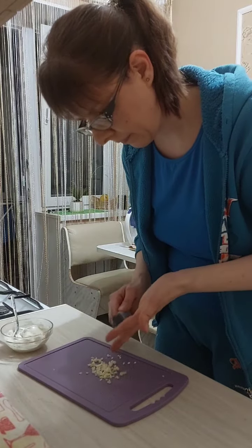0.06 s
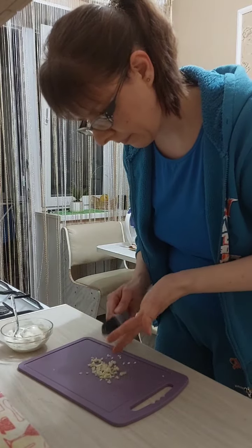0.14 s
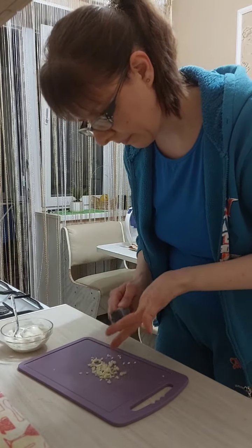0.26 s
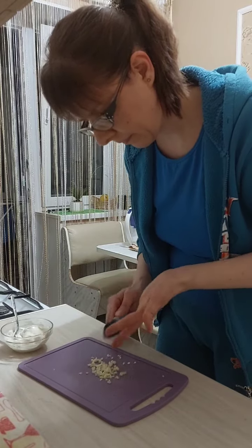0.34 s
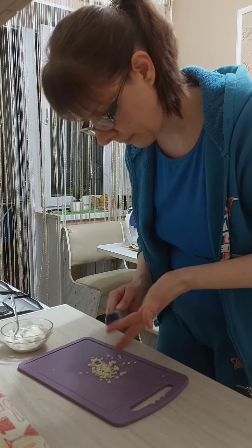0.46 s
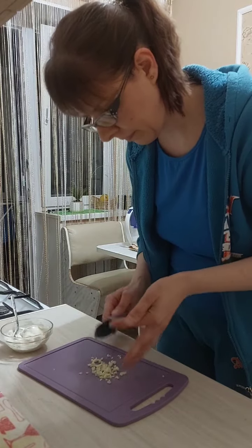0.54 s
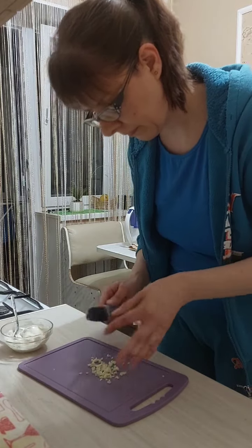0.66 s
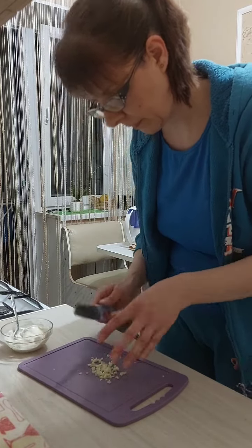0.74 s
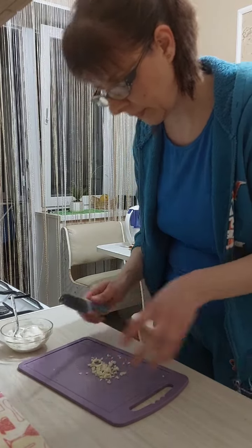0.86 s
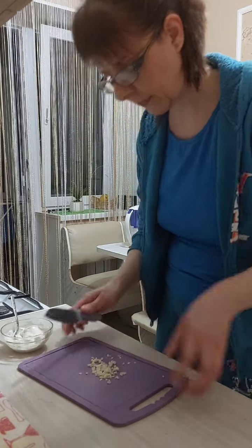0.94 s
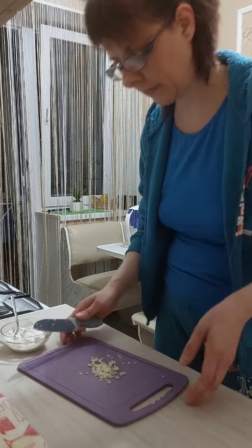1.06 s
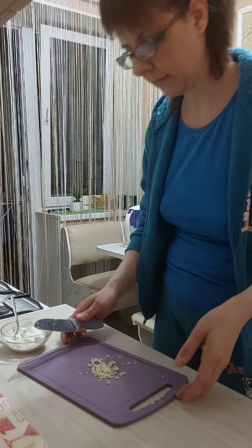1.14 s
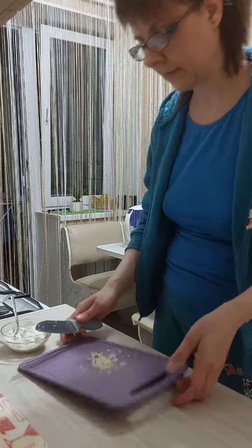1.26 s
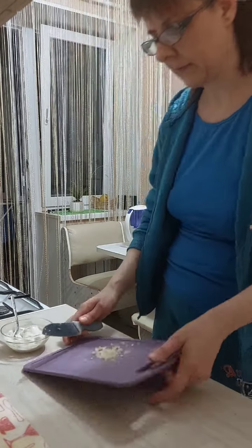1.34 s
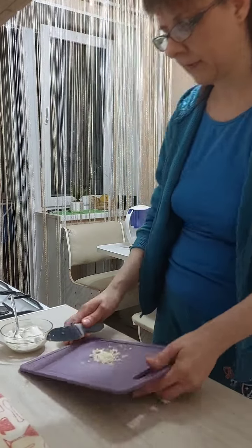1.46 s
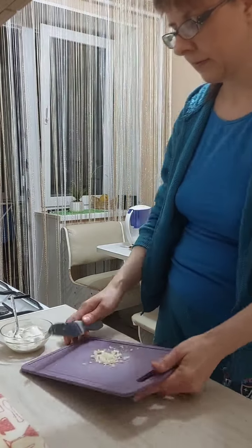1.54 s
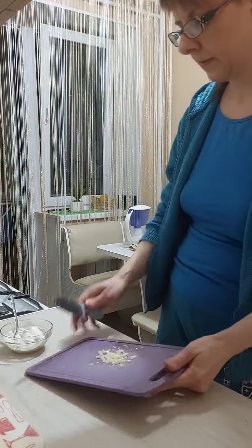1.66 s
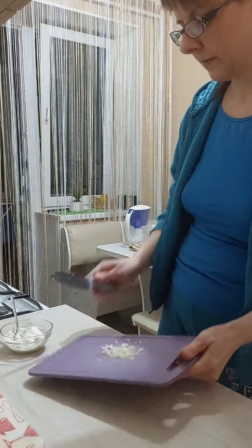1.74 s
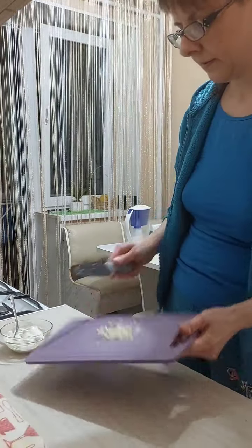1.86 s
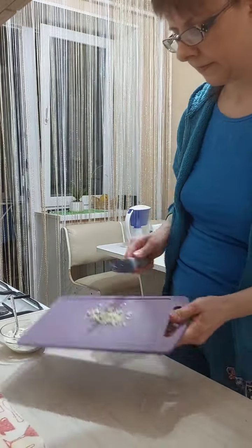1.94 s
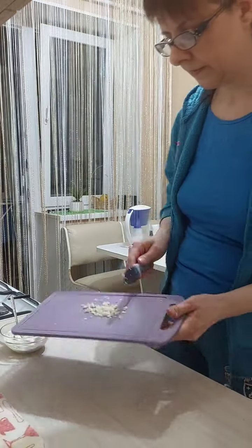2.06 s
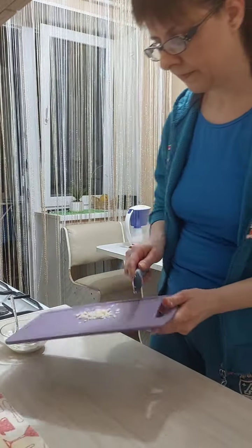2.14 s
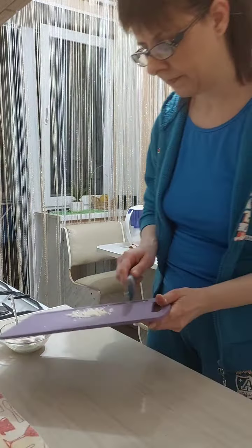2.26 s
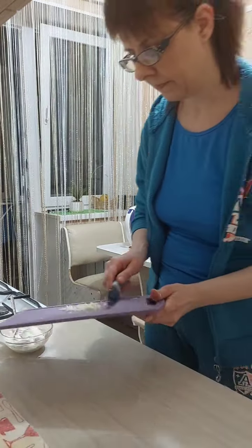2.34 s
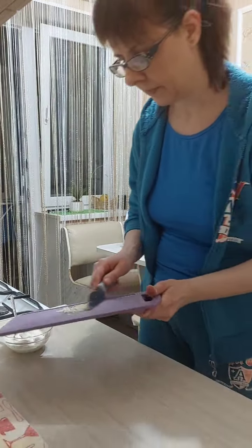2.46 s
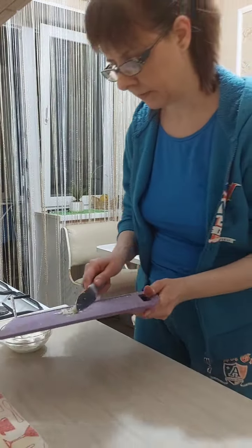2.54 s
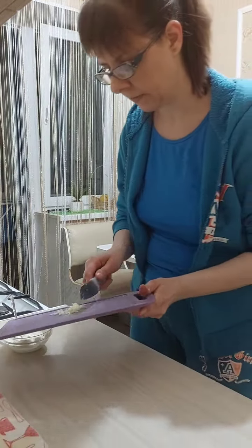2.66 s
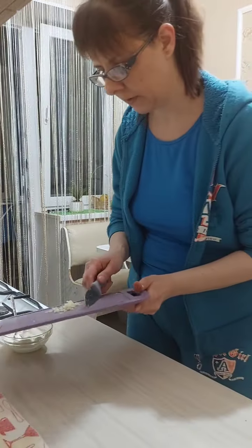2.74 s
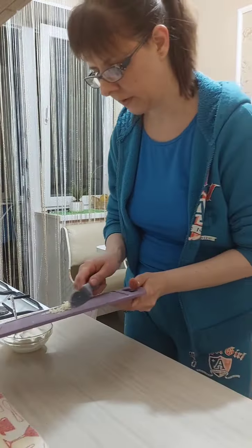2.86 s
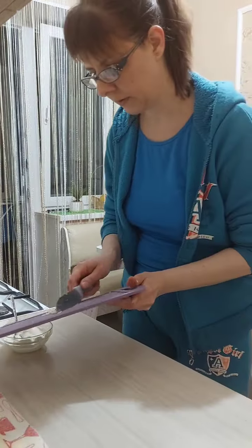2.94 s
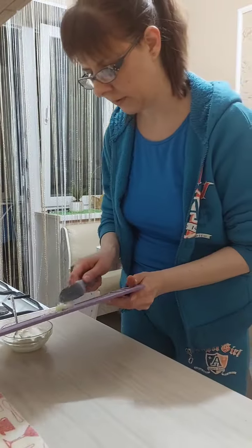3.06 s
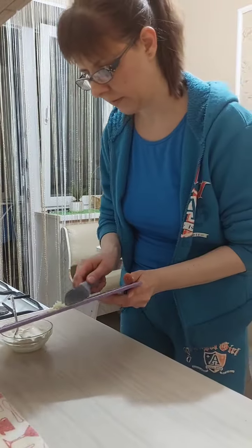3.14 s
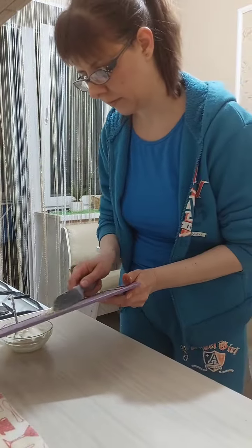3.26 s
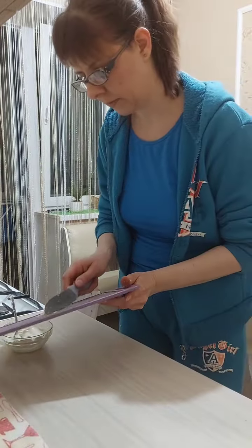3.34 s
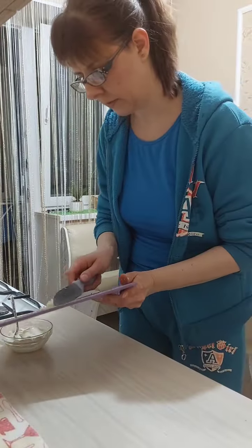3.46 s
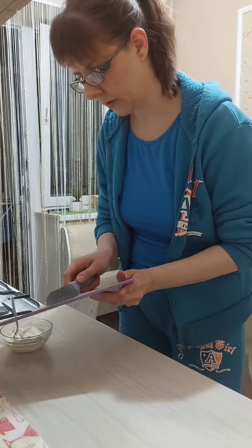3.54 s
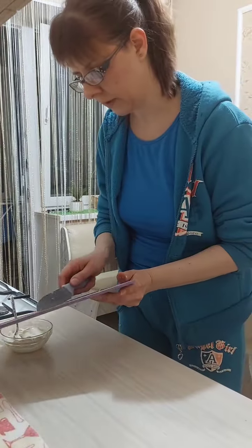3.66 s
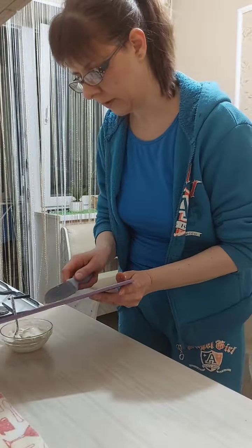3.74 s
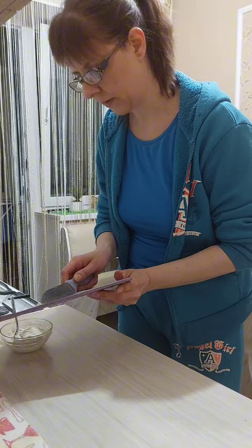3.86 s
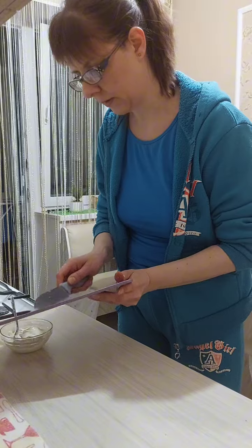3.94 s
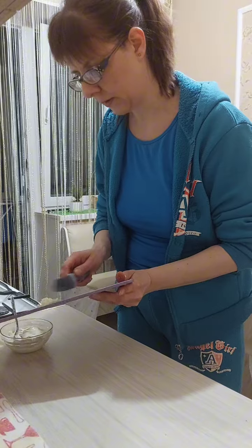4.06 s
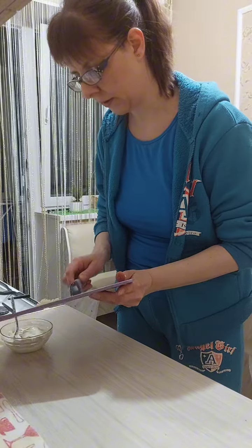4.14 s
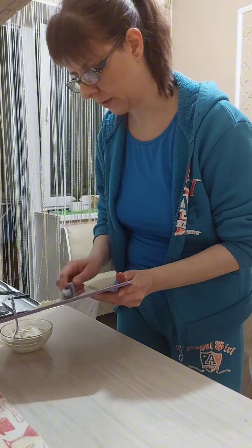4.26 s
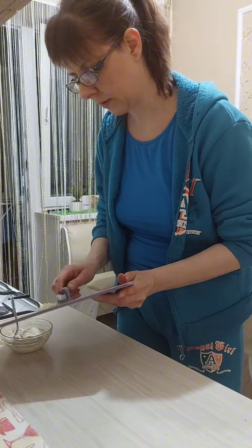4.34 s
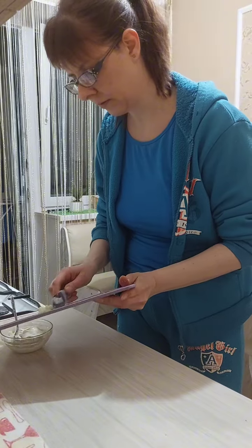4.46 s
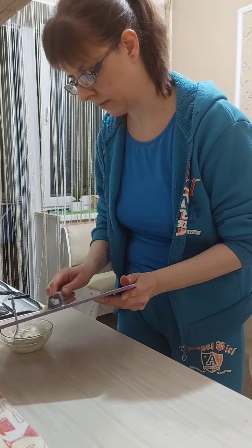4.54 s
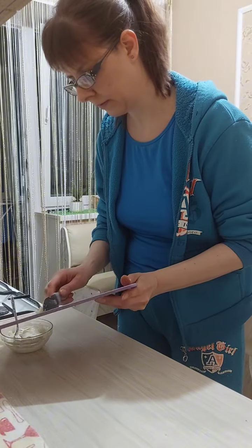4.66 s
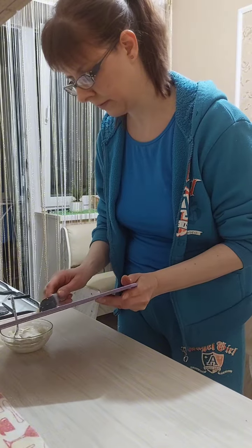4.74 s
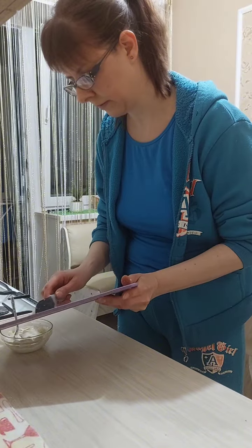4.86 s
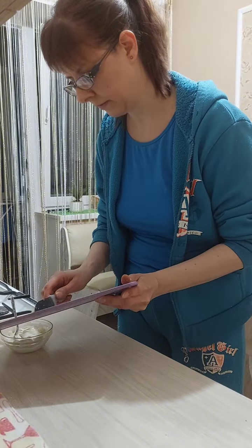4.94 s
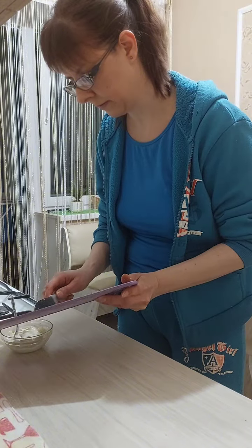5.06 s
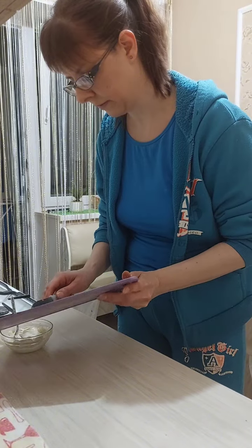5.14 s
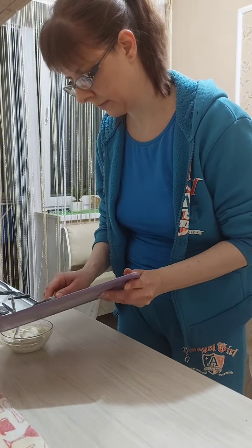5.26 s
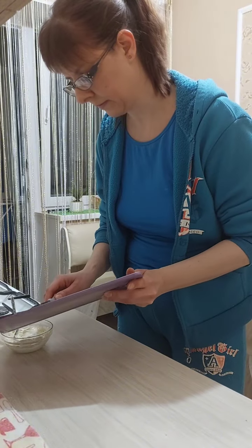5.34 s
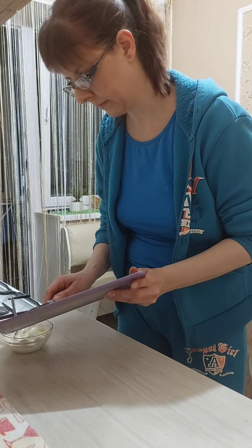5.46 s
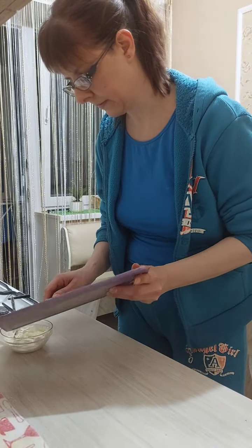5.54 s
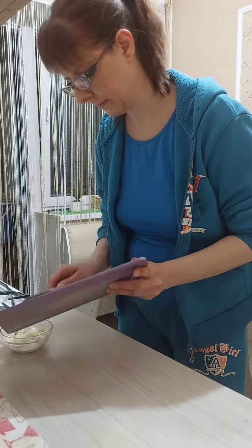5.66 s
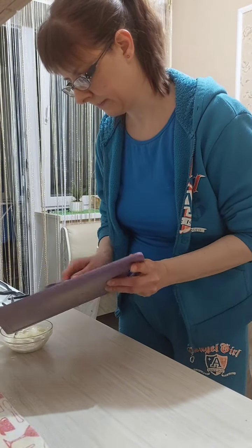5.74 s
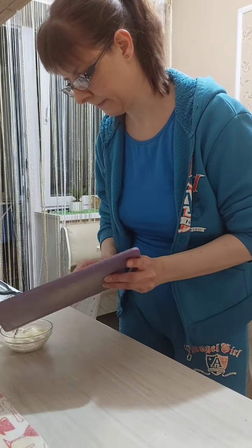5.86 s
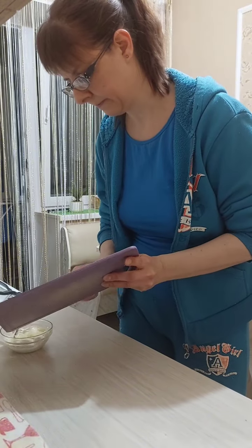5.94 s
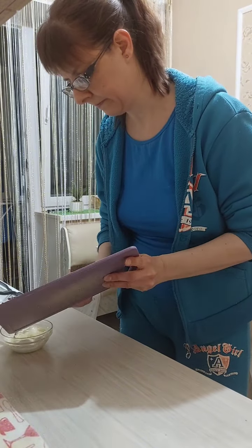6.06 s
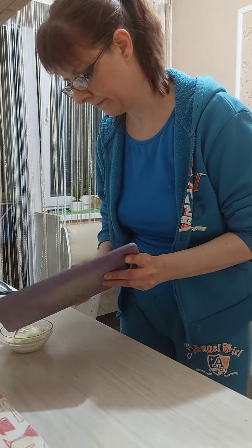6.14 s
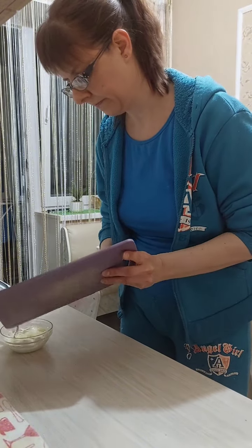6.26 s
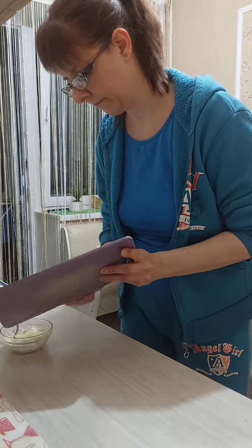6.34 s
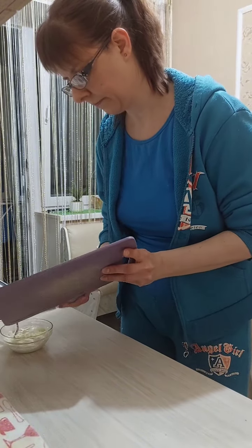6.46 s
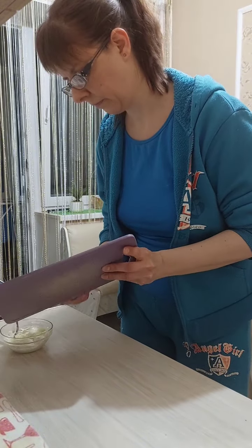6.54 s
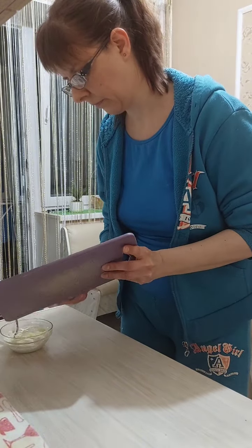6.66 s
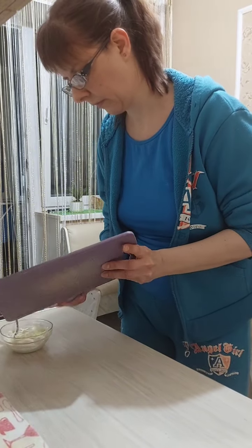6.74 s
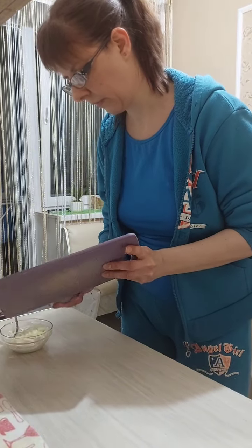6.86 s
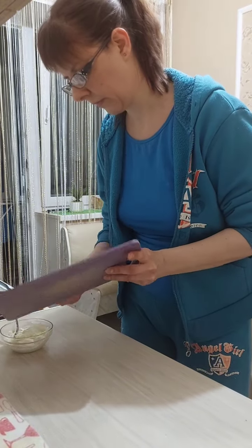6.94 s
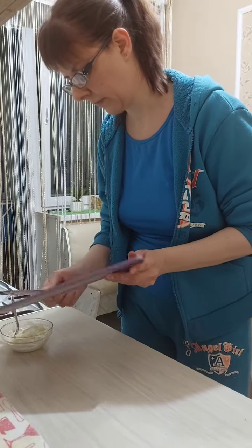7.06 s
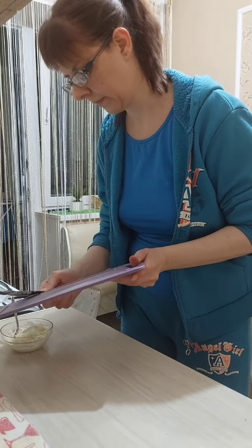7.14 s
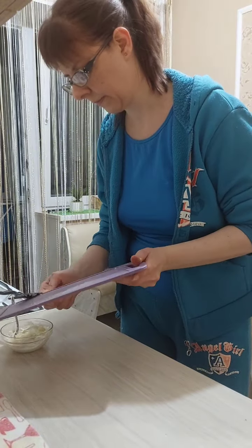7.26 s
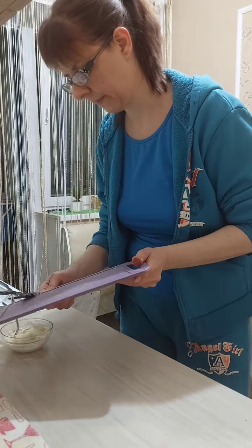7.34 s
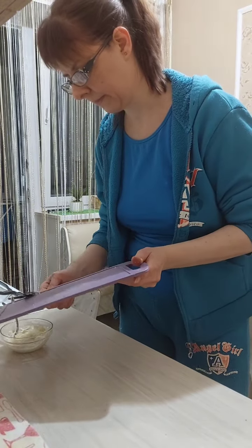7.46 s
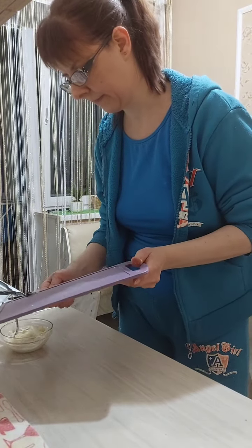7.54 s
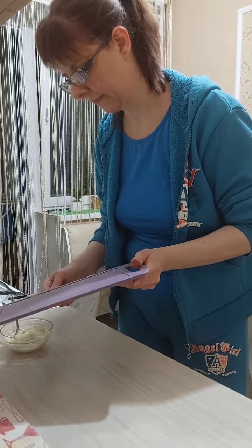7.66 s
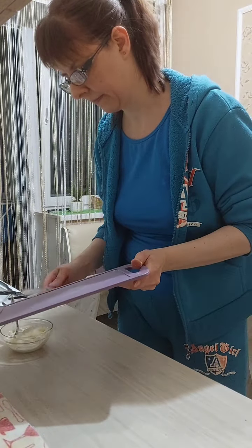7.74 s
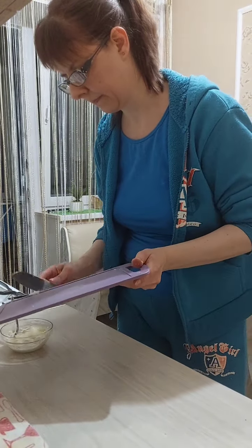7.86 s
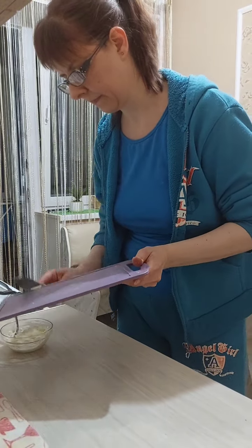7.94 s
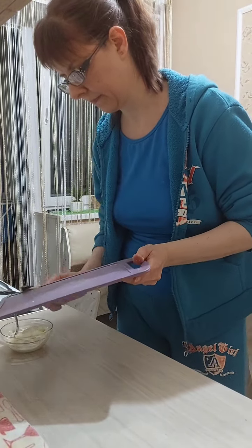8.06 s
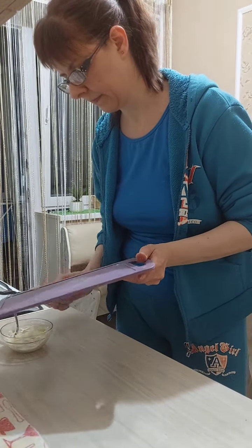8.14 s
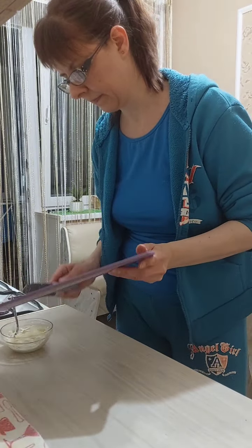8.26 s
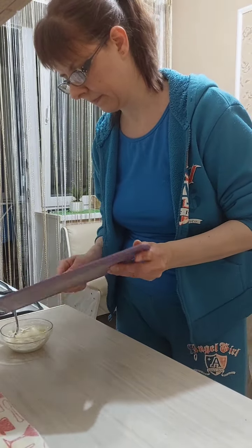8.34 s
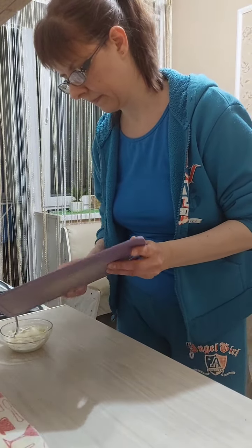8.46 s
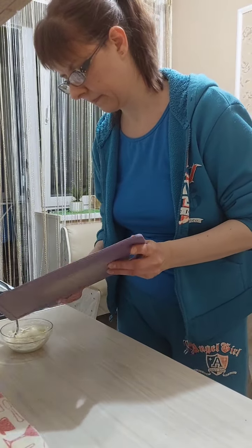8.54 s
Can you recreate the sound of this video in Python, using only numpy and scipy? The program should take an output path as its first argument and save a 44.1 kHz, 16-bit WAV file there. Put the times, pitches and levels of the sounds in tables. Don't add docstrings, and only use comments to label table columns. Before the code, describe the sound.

A steady low hum with soft air and a very faint high whine fills a small tiled kitchen. In the first second only barely audible finger wipes brush the blade. From 1.0 to 1.7 come dull table thumps, light steel clinks and small skids, then a faint draught as the board is carried. At 2.3 the blade lands with a sharp clack and a loud, rib-buzzing scrape; quick knock-and-rasp strokes follow at 2.8, 3.2, 3.5 and 3.8. A strong knock at 4.15 leads into a long dull push fading by 4.9. A softer scrape swells near 5.45. Thudding strokes at 5.85 and 6.3 sound brighter, then two hard knocks at 6.6 and 6.75 with short skids and low thumps. Light touches at 7.1 and 7.7, a tap at 8.0, and a final bright swipe around 8.4 to 8.6. Close stereo phone microphone, short echo.

```python
import sys
import numpy as np
from scipy import signal
from scipy.fft import rfft, irfft
from scipy.io import wavfile
from scipy.ndimage import uniform_filter1d

SR = 44100
rng = np.random.default_rng(int(sys.argv[2]) if len(sys.argv) > 2 else 0)


def persist_wave(psi):
    counts = np.round(np.clip(psi, -1, 1) * 32767).astype(np.int16)
    wavfile.write(sys.argv[1], SR, np.atleast_2d(counts).T)


def amplitude_ratio(level_db):
    exponent = np.asarray(level_db, float) / 20
    return 10 ** exponent


N = 379260

# pitch_hz, level_db
HUM_LINES = [(50, -60.5), (100, -37), (200, -83.5), (400, -74.5)]
# pitch_hz, density_db_per_hz
AIR_SPECTRUM = [(25, -36.5), (50, -8), (75, -12.5), (150, -13.5), (300, -23), (600, -39.5), (1200, -49.5),
                (2500, -56.5), (4600, -58), (6000, -63.5), (8000, -58.5), (10500, -53), (13000, -56.5),
                (16000, -55)]
# pitch_hz, width_hz, level_db
WHINE_MODES = [(3973, 30, -4.5), (10300, 40, -1), (14750, 40, -4)]
# pitch_hz, width_hz, level_db
TABLE_MODES = [(88.4, 32, 1), (124.4, 31.7, 9.5), (157, 43, 4.5), (222, 62, -4.5)]
# peak_s, level_db
TABLE_SHAKES = [(1.026, -44), (1.17, -44), (1.312, -43), (1.38, -62), (1.48, -47.5), (1.6, -48),
                (3.174, -44), (3.26, -42), (3.33, -49), (6.58, -40), (6.764, -37), (8.012, -43),
                (8.418, -45), (8.476, -61)]
# start_s, peak_db
WIPES = [
    (0.1094, -75),
    (0.3566, -64),
    (0.5024, -65),
    (5.0594, -83),
]
# pitch_hz, width_hz, level_db
WET_BLADE_MODES = [(2200, 300, -12), (2880, 200, -1), (3980, 220, 1), (8160, 400, -14), (11000, 260, -3.5)]
# start_s, peak_db
STEEL_CLINKS = [
    (1.298, -45),
    (1.347, -42),
    (1.458, -52),
    (1.515, -51),
    (2.331, -32),
    (7.131, -37.5),
    (7.659, -59),
]
# start_s, end_s, level_db
DRAUGHTS = [
    (1.597, 1.977, -59),
    (2.04, 2.297, -60.5),
]
# pitch_hz, width_hz, level_db
DRAUGHT_MODES = [(437, 28, 4.5), (556, 40, 3), (832, 50, 1)]
# start_s, length_s, level_db, brightness_db, extra_edge_db
BRUSH_TOUCHES = [(1.005, 0.15, -74, 0, -13), (1.41, 0.058, -61, -13, 6), (1.538, 0.1, -55, -13, -1),
                 (1.698, 0.28, -69, 5, -6), (4.054, .065, -34.5, -45, 4), (5.032, 0.055, -82.5, -16, -2),
                 (5.132, 0.098, -43, -38, -5), (7.17, 0.17, -62.5, 11, -13), (7.35, 0.31, -75, 10, -9),
                 (7.595, 0.038, -74, 7, 4), (7.655, 0.043, -71.5, 11, 0), (8.023, 0.12, -55.5, 9, 9)]
# start_s, upper_peak_db, low_minus_upper_db, hardness_db
BLADE_LANDINGS = [(1.019, -67.5, 12, -8), (1.291, -38, -12, 8), (1.345, -52, -6, 14.5), (1.457, -49, -7, 5),
                  (1.514, -43, -18, 0), (1.611, -45.5, 1, 5.5), (2.329, -21, -5, 9),
                  (2.78, -20.5, -10.5, -6), (3.161, -19, -8.5, -1), (3.48, -19.5, -5.5, -0.5),
                  (3.805, -23.5, -1.5, -5), (4.058, -41, -3, -12), (4.079, -38, -9, -23),
                  (4.149, -16.5, -7.5, 0), (4.409, -35, -15, -8), (5.136, -52, -5, -5),
                  (5.383, -39, -18, -6), (5.85, -16.5, -7, -16.5), (6.29, -16.5, -1, -11),
                  (6.354, -32.5, -7, -3), (6.576, -24.5, -5, 4.5), (6.761, -23, -4, 7.5),
                  (7.131, -33, -10.5, -5), (7.251, -60, -4, 11), (7.658, -67, -3, 5), (7.69, -59.5, -14, 0),
                  (7.999, -40, 3.5, 18), (8.409, -33.5, 0.5, 6.5)]
# start_s, level_db, fade_db_per_s, brightness_db
FADING_SKIDS = [
    (1.295, -39.5, 146, -12.5),
    (1.445, -49, 200, -11.5),
    (1.516, -51, 500, -10),
    (1.62, -47, 230, -9.5),
    (6.606, -35, 326, 0.5),
    (6.782, -36, 262, 3.5),
    (7.149, -48.5, 138, -13),
    (7.685, -60, 260, -6),
    (8.02, -45.5, 170, -15),
]
# landing_s, fastest_s, first_drag_db, sweep_db, sweep_brightness_db
QUICK_STROKES = [
    (2.326, 2.485, -25.5, -30, -8),
    (2.772, 2.92, -37.5, -35, -10.5),
    (3.171, 3.279, -33.5, -34, -9.5),
    (3.494, 3.604, -38, -36, -9.5),
    (3.799, 3.912, -35, -32.5, -8.5),
    (5.859, 6.035, -30, -31.5, -4.5),
    (6.296, 6.393, -35, -36.5, 4),
    (8.404, 8.55, -41.5, -33.5, 2.5),
]
# time_s, pressure_db, brightness_db
SLOW_PUSHES = [
    [(4.18, -32.5, -19.5), (4.36, -36.5, -16), (4.385, -38.5, -21), (4.44, -35.5, -15), (4.49, -36, -14),
     (4.59, -36.5, -16.5), (4.78, -45.5, -20.5), (4.906, -55, -32), (4.95, -77, -36)],
    [(5.134, -58, 1), (5.198, -52, -2), (5.27, -48, -20.5), (5.36, -43.5, -13.5), (5.45, -37.5, -15),
     (5.53, -46.5, -2.5), (5.6, -74, -24)],
]
# pitch_hz, width_hz, level_db
BODY_MODES = [(665.2, 26, -1.5), (786, 50, -2), (946, 39, 1), (1087, 170, -6), (1317, 68, -5.5)]
# pitch_hz, width_hz, level_db
LOW_MODES = [(272.6, 43, -8), (348.5, 49, -4.5), (427.5, 67, -3), (511, 51, 2.5)]
# pitch_hz, width_hz, level_db
EDGE_MODES = [(1508, 140, -1.5), (1670, 85, 1), (1887, 160, -3.5), (2208, 97, 0.5), (2557, 270, -4),
              (2940, 250, -3.5), (3290, 420, -7.5), (3950, 170, -6.5), (4386, 470, -8.5)]
# pitch_hz, width_hz, level_db
STEEL_MODES = [(5710, 870, -11.5), (7350, 810, -7.5), (9540, 1230, -6.5), (11370, 670, -0.5),
               (12470, 1200, -6.5), (14700, 880, -13)]
# pitch_hz, width_hz, level_db
STRUCK_MODES = [
    [(686, 160, 3), (1000, 215, -0.5), (1145, 405, -4.5)],
    [(144, 90, -13), (277, 62, -3), (503.5, 102, 2)],
    [(1648, 290, -8), (2233, 270, -1), (2530, 700, -3), (3760, 1100, -9.5), (4510, 1000, -7.5)],
    [(5930, 1300, 7), (11000, 4800, 0)],
]
# start_s, length_s, pitch_hz, level_db, second_harmonic_db
RIB_RIDES = [
    (2.335, 0.12, 178, -47, -12),
    (2.41, .19, 206.8, -39.5, -24),
    (2.8, .13, 218.3, -48, 9),
    (3.56, 0.16, 167.9, -44, -6.5),
    (3.846, 0.12, 202.2, -47, 5),
    (4.062, .062, 162, -44, 0),
]
# start_s, end_s, pitch_hz, level_db
FINGER_SQUEAK = (5.04, 5.13, 3120, -69)
# pitch_hz, t60_s
KITCHEN_DECAY = [(300, 0.52), (1000, 0.41), (3000, 0.43), (7000, 0.27), (12000, 0.082)]


def two_ports(shape, alike):
    alike = np.clip(alike, 0, 1)
    common = rng.standard_normal(shape)
    own = rng.standard_normal((2, *shape))
    return np.sqrt(alike) * common + np.sqrt(1 - alike) * own


def walk(rate_hz):
    hold = int(SR / rate_hz)
    steps = np.repeat(rng.standard_normal(N // hold + 1), hold)
    return 1.52 * uniform_filter1d(steps, hold)[:N]


def ring(x, modes, damping=0.83, shift_db=0.):
    banks = []
    for k, (hz, width_hz, db) in enumerate(modes):
        banks.append((signal.iirpeak(hz, hz / width_hz / damping, SR), (-1) ** k * amplitude_ratio(db)))
    probe = np.eye(1, 8192)[0]
    norm = np.linalg.norm(sum(g * signal.lfilter(*ba, probe) for ba, g in banks))
    if not shift_db:
        return sum(g * signal.lfilter(*ba, x) for ba, g in banks) / norm
    knots = np.arange(0, N, SR // 9)
    drift = amplitude_ratio(shift_db * rng.standard_normal((len(modes), len(knots))))
    out = 0
    for (ba, g), d in zip(banks, drift):
        out = out + g * signal.lfilter(*ba, x * np.interp(np.arange(N), knots, d))
    return out / norm


def gains(tables, fade_s=0.019):
    out = np.zeros((len(tables[0][0]) - 1, N))
    for rows in tables:
        s, *columns = np.transpose(rows)
        i = np.arange(int((s[0] - fade_s) * SR), min(int((s[-1] + fade_s) * SR), N))
        outside_s = np.minimum(i / SR - s[0], s[-1] - i / SR)
        gate = np.clip(outside_s / fade_s + 1, 0, 1)
        out[:, i] += gate * amplitude_ratio(np.array([np.interp(i / SR, s, c) for c in columns]))
    return out


def bursts(events, parts, rise_s, fall_s, tail_db, tail_s):
    t = np.arange(int(.12 * SR)) / SR
    fall = np.exp(-(t / fall_s) ** 2) + amplitude_ratio(tail_db) * np.exp(-t / tail_s)
    rattle = two_ports((len(events), len(t)), 0.51) * (1 - np.exp(-t / rise_s)) * fall
    out = np.zeros((len(parts), 2, N + len(t)))
    for part, modes in enumerate(parts):
        rings = ring(rattle, modes)
        rings = rings / np.abs(rings).max(axis=2, keepdims=True)
        for k, (s, *peak_db) in enumerate(events):
            i = int((s - rise_s) * SR)
            out[part, :, i:i + len(t)] += amplitude_ratio(peak_db[part]) * rings[:, k]
    return out[:, :, :N]


def background():
    t = np.arange(N) / SR
    hum = 0
    for line_hz, db in HUM_LINES:
        level = np.sqrt(2) * amplitude_ratio(db + .4 * walk(5))
        hum = hum + level * np.sin(2 * np.pi * line_hz * t + .25 * walk(3))

    rise_s, fall_s, edge_db = 0.026, 0.11, -14
    shakes = [[(s - rise_s, db + edge_db), (s, db), (s + fall_s, db + edge_db)] for s, db in TABLE_SHAKES]
    table = gains(shakes, 0.012)[0] * ring(rng.standard_normal(N), TABLE_MODES) * amplitude_ratio(1.5)
    bass = (hum + table) * amplitude_ratio(np.array([[-1.2], [1.1]]))

    hz = np.arange(N // 2 + 1) * SR / N + 1
    air_hz, air_db = np.transpose(AIR_SPECTRUM)
    colour = amplitude_ratio(np.interp(np.log(hz), np.log(air_hz), air_db))
    mid, side = rfft(rng.standard_normal((2, N))) * colour
    side = side * np.clip(hz / 850.0, .15, .95)
    air = irfft(np.array([mid + side, mid - side]), N)
    whine = np.array([ring(n, WHINE_MODES) for n in rng.standard_normal((2, N))]) * amplitude_ratio(-95.5)
    return bass + whine + air / air.std() * amplitude_ratio(-53)


def handling():
    wipes = bursts(WIPES, [WET_BLADE_MODES], 0.0059, .006, -17.0, .014)[0] * amplitude_ratio(12.5)
    clinks = bursts(STEEL_CLINKS, STRUCK_MODES[-1:], 0.00042, .005, -14, 0.013)[0] * amplitude_ratio(8.5)
    carried = gains([[(start, db), (end, db)] for start, end, db in DRAUGHTS], .03)[0]
    draught = carried * ring(two_ports((N,), 0.73), DRAUGHT_MODES) * amplitude_ratio(1.7)
    return wipes + clinks + draught


def brushes():
    edge_db, rise_share = -11, 0.5
    return [[(s, db + edge_db, *tone), (s + rise_share * length_s, db, *tone), (s + length_s, db + edge_db, *tone)]
            for s, length_s, db, *tone in BRUSH_TOUCHES]


def skids():
    depth_db, dull_db = 29.5, -13
    return [[(s, db, bright), (s + depth_db / fade, db - depth_db, bright + dull_db)]
            for s, db, fade, bright in FADING_SKIDS]


def strokes():
    settle_s, drag_bright_db, drag_hard_slope = 0.029, -21, 0.74
    slack_share, slack_db, slack_dull_db = 0.37, -4, -3
    hold_s, hold_db = 0.035, -5
    lift_s, lift_db, lift_dull_db = 0.12, -26.5, -9.5
    landings = np.transpose(BLADE_LANDINGS)
    out = []
    for land, fast, drag, sweep, bright in QUICK_STROKES:
        hard_db = landings[-1][np.argmin(np.abs(landings[0] - land))]
        drag_s = land + settle_s
        slack_s = drag_s + slack_share * (fast - land - settle_s)
        out.append([(drag_s, drag, drag_bright_db + drag_hard_slope * hard_db),
                    (slack_s, (drag + sweep) / 2 + slack_db, bright + slack_dull_db),
                    (fast, sweep, bright),
                    (fast + hold_s, sweep + hold_db, bright),
                    (fast + max(lift_s, hold_s), sweep + lift_db, bright + lift_dull_db)])
    return out


def shares(s, db, bright_db, extra_db=0):
    soft_db, full_edge_db = -34, 3
    low_db = db - 7.5 - 0.21 * max(bright_db, soft_db)
    edge_db = min(3.5 + 0.54 * bright_db, full_edge_db) + min(bright_db - soft_db, 0) + extra_db
    return s, db, low_db, db + edge_db, db + bright_db


def darken(parts):
    dull = signal.butter(N=2, Wn=5060, fs=SR, output="sos")
    return [signal.sosfilt(dull, part) for part in parts[:-1]] + parts[-1:]


def board():
    grip = amplitude_ratio(1.6 * walk(900) + 2.0 * walk(90) + 1.36 * walk(25))
    grip = grip / np.sqrt(np.mean(grip ** 2))
    contacts = list(SLOW_PUSHES) + strokes() + skids() + brushes()
    rub = gains([[shares(*row) for row in rows] for rows in contacts])

    hits = [(s, db, db + low, db + hard, db - 15 + 1.32 * hard) for s, db, low, hard in BLADE_LANDINGS]
    blows = bursts(hits, STRUCK_MODES, .0008, 0.0056, -8.5, 0.017)
    blows = blows * amplitude_ratio(np.array([7.96, 7.85, 3.0, 7.04]))[:, None, None]

    parts, alike = (BODY_MODES, LOW_MODES, EDGE_MODES, STEEL_MODES), (0.78, 1.0, 0.5, 0.35)
    both = []
    for force, modes, share, struck in zip(rub, parts, alike, blows):
        grains = force * grip * two_ports((N,), share)
        both.append(ring(grains, modes, 1.05, 2.43) + struck)
    return sum(darken(both))


def chatter():
    out, waver = np.zeros(N), walk(30)
    for start, length, rib_hz, db, second_db in RIB_RIDES:
        i = np.arange(int(start * SR), int((start + length) * SR))
        turn = 2 * np.pi * np.cumsum(rib_hz * (1 + 0.0125 * waver[i])) / SR
        wave = np.sin(turn) + amplitude_ratio(second_db) * np.sin(2 * turn)
        wave = wave + amplitude_ratio(-8.) * (np.sin(4 * turn) + np.sin(5 * turn))
        swell = np.sin(np.linspace(0, np.pi, len(i))).clip(0) ** 1.3
        out[i] += amplitude_ratio(db + 5.5) * swell * wave
    return out


def squeak():
    start, end, hz, db = FINGER_SQUEAK
    t = np.arange(N) / SR
    swell = np.sin(np.pi * np.clip((t - start) / (end - start), 0, 1))
    turn = 2 * np.pi * np.cumsum(hz * (1 + .02 * walk(60))) / SR
    return amplitude_ratio(db) * swell * np.sin(turn)


def delay(x, lag_s):
    return np.append(np.zeros(round(lag_s * SR)), x)[:N]


def ports(x):
    lag_s, bass_alike = .00048, 0.97
    bass = signal.sosfiltfilt(signal.butter(N=2, Wn=520, fs=SR, output="sos"), x)
    upper = x - bass
    heard = bass_alike * bass.mean(axis=0) + (1 - bass_alike) * bass
    left = upper[0] * amplitude_ratio(-4.0) + heard[0] * amplitude_ratio(-2.0)
    right = delay(upper[1], lag_s) * amplitude_ratio(2.5) + delay(heard[1], lag_s / 2) * amplitude_ratio(-0.1)
    return np.array([left, right])


def kitchen(x, wet_db):
    alike_hz = 262
    t = np.arange(int(.7 * SR)) / SR
    tail = 0
    for hz, t60_s in KITCHEN_DECAY:
        noise = two_ports((len(t),), alike_hz / hz)
        band = np.array([ring(n, [(hz, 0.99 * hz, 0)]) for n in noise])
        tail = tail + band * np.sqrt(hz / t60_s) * amplitude_ratio(-60 * t / t60_s)
    tail = tail * (1 - np.exp(-(t / .008) ** 2))
    tail = tail / np.linalg.norm(tail, axis=1, keepdims=True)
    return amplitude_ratio(wet_db) * signal.fftconvolve(x[None], tail, axes=1)[:, :N]


def scene():
    near = handling() + board() + chatter() + squeak()
    return background() + ports(near) + kitchen(near[0], -7.5)


def band_limit(x):
    return signal.sosfilt(signal.butter(12, 16830, fs=SR, output="sos"), x)


def record(dry):
    low_pass = signal.ellip(8, .2, 60, 15900, fs=SR, output="sos")
    mix = signal.sosfilt(low_pass, dry)
    return band_limit(mix)


dry = scene()
out = record(dry)
persist_wave(out)
```